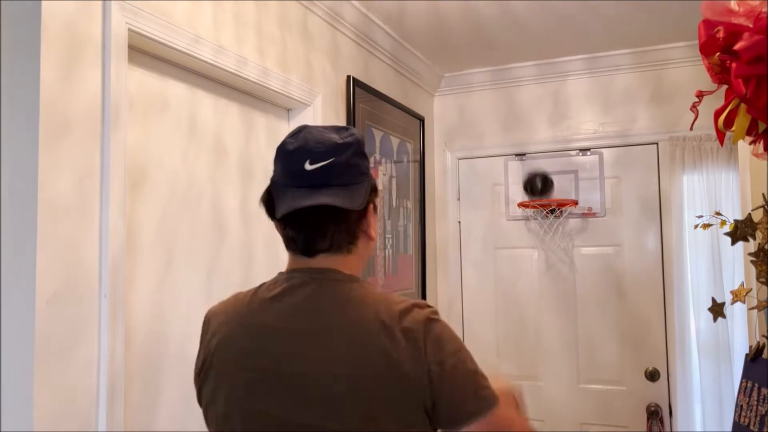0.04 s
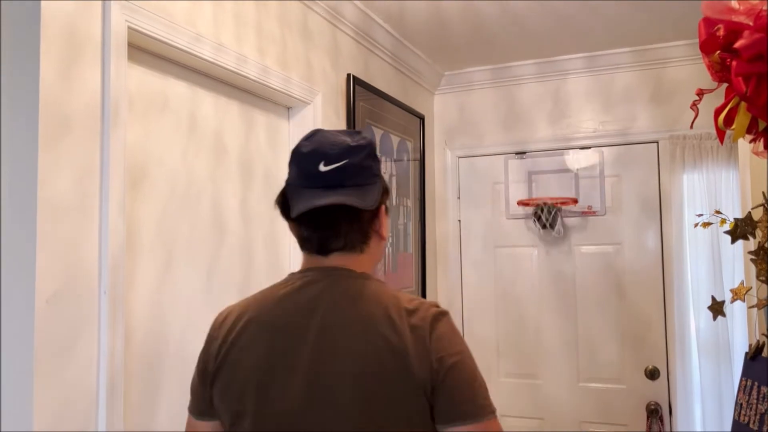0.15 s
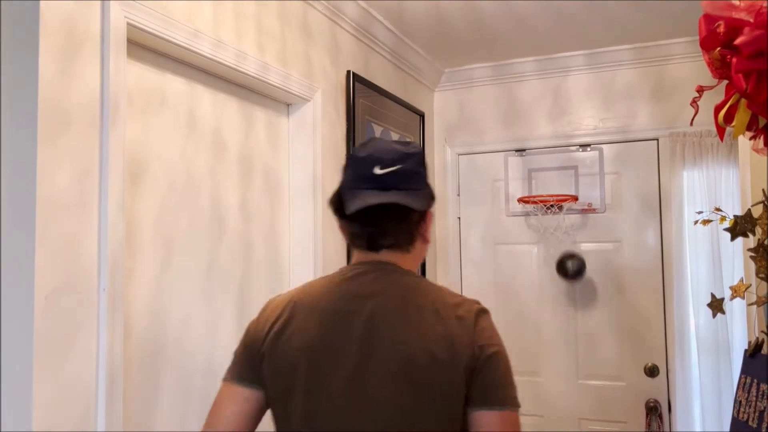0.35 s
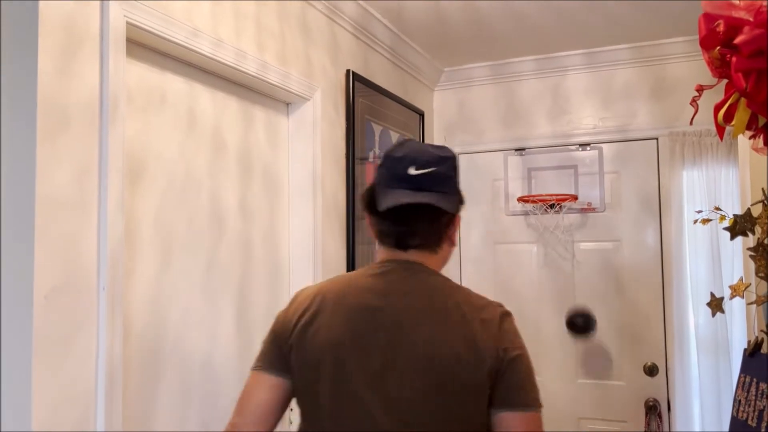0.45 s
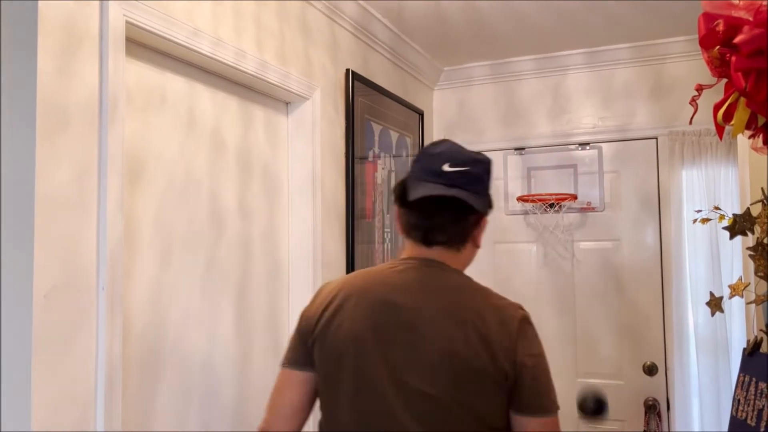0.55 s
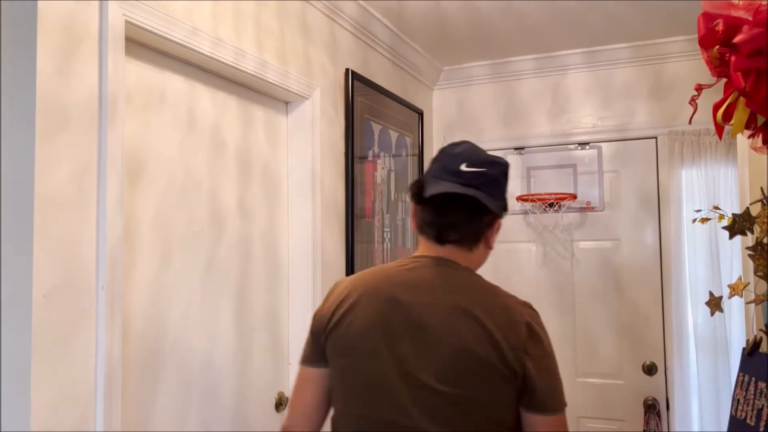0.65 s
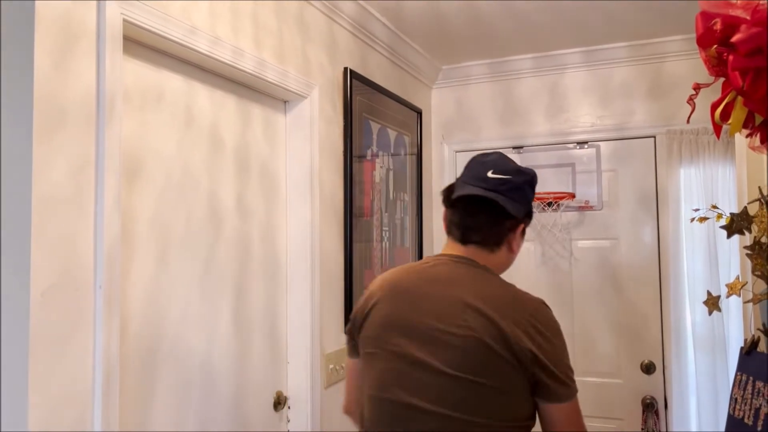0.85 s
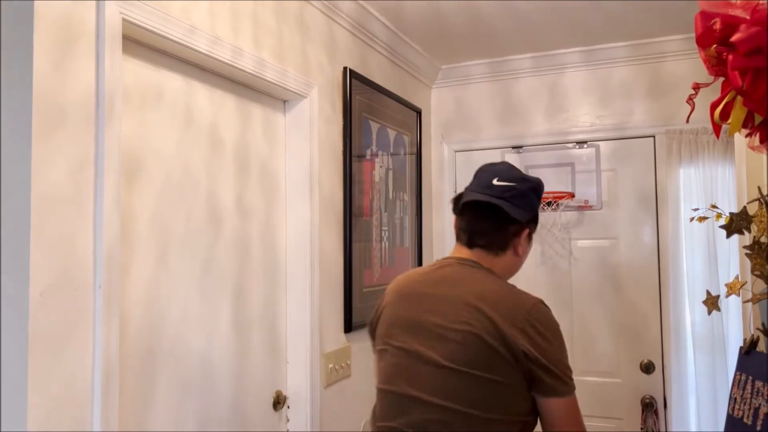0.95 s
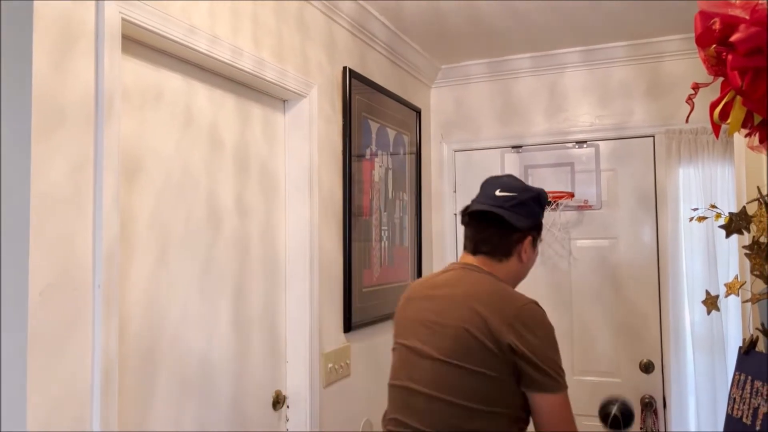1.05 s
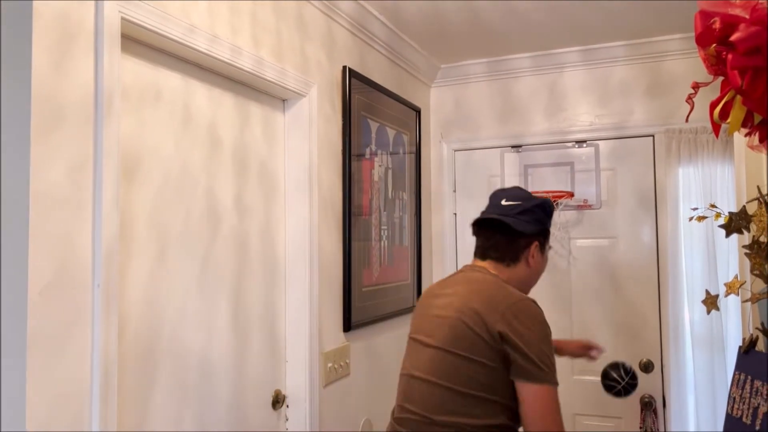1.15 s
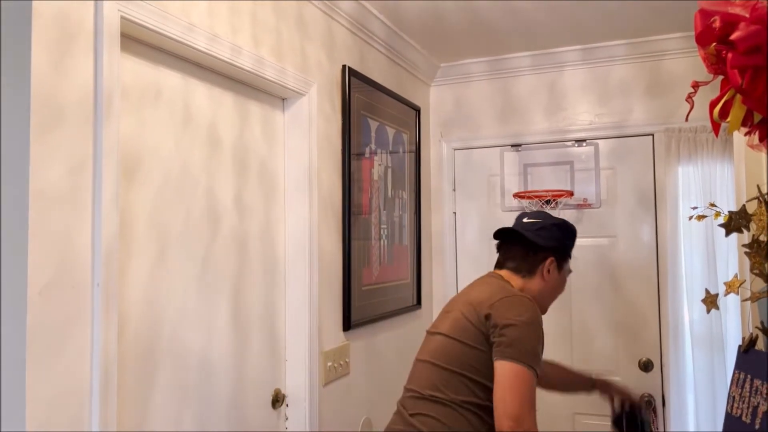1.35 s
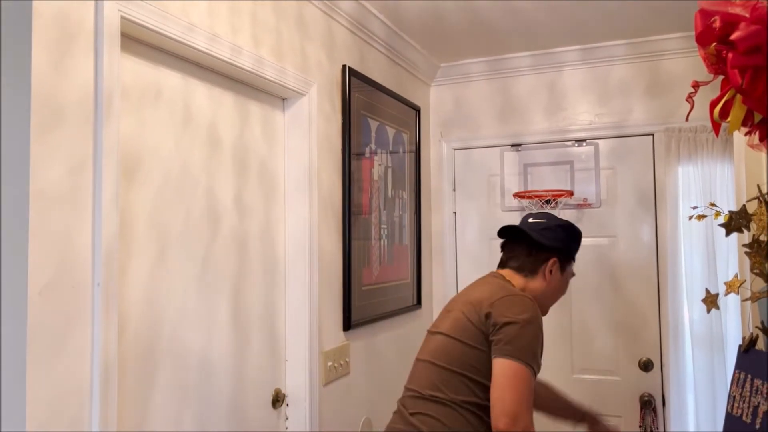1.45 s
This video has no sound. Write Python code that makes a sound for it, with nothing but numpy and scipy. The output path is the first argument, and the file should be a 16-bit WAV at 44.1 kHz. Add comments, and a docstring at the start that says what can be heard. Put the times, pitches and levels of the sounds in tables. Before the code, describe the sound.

Toy hoop rattle and dull door thumps come first, then faint rim ticks and one loud ball bounce on a hard floor, ending with a soft hand touch, in a small, lively indoor hallway, in stereo.

```python
"""In a hallway, a small ball grazes a toy hoop hung on a hollow door and strikes its rim.
The rim and board ring as decaying modes over bursts of clatter noise, and the board thumps the door.
The ball then slaps on the hard floor with a noise slap, a ringing body and a low thud, is touched by
a hand and starts a new bounce. The hallway answers with decaying noise over a rumble and a house hum."""
import sys
import numpy as np
from scipy import signal
from scipy.fft import rfft, irfft, next_fast_len
from scipy.io import wavfile

SR = 44100
rng = np.random.default_rng(int(sys.argv[2]) if len(sys.argv) > 2 else 0)


def transcribe(signal):
    """Save signal, clipped to [-1, 1], as a 16-bit WAV file at the path in sys.argv[1]."""
    frames = np.atleast_2d(signal).T
    limited = np.clip(frames, -1, 1)
    pcm = np.round(limited * 32767).astype(np.int16)
    wavfile.write(sys.argv[1], SR, pcm)


N = 66150
T = np.arange(N) / SR  # seconds


def amp(db):
    """Turn dB into gain."""
    return 10 ** (np.asarray(db) / 20)


def unit(x):
    """Scale a signal to rms 1."""
    return x / np.sqrt(np.mean(x ** 2) + 1e-20)


def along(points, hz):
    """Read a curve of (Hz, value) points on a log frequency axis."""
    f, v = np.transpose(points)
    return np.interp(np.log(hz + 1), np.log(f + 1), v)


def filtered(x, response):
    """Multiply the spectrum of x by a response given as a function of frequency."""
    size = next_fast_len(N + 8192)
    spectrum = rfft(x, size) * response(np.fft.rfftfreq(size, 1 / SR))
    return irfft(spectrum, size)[..., :N]


def shape(start, rise, t60):
    """Soft rise from the start, then exponential decay by 60 dB in t60 seconds."""
    t = np.maximum(T - start, 0)
    return (1 - np.exp(-t / rise)) * amp(-60 * t / t60)


def ring(modes, start, rise, scatter_db, rough_hz=0):
    """Modes set ringing at one moment, first swing inward; a random phase walk widens rough ones."""
    gains = amp(scatter_db * rng.standard_normal(len(modes)))
    first = min(int(start * SR), N - 1)
    steps = rng.standard_normal((len(modes), N - first))
    wander = np.cumsum(steps, axis=1) * np.sqrt(2 * np.pi * rough_hz / SR)
    out = np.zeros(N)
    for gain, phase, (hz, db, t60) in zip(gains, wander, modes):
        swing = np.sin(2 * np.pi * hz * (T[first:] - start) + phase)
        out[first:] -= gain * amp(db) * shape(start, rise, t60)[first:] * swing
    return out


def noise(spectrum):
    """Coloured noise of rms 1."""
    return unit(filtered(rng.standard_normal(N), lambda hz: amp(along(spectrum, hz))))


# Contacts with the hoop. Each row: start in seconds, ring level in dB, clatter level in dB,
# time for the clatter to fall by 20 dB in seconds.
HOOP_CONTACTS = [(0.195, -44, -36, 0.039), (0.246, -32.5, -14, 0.027), (.256, -24.5, -23, .015),
                 (0.292, -29.5, -25.5, .01), (0.319, -32, -25, 0.025), (0.333, -23, -21, 0.024),
                 (0.338, -26.5, -24, .01), (0.344, -39.5, -24, 0.018), (0.381, -50.5, -36, 0.014),
                 (0.407, -70, -52.5, 0.027), (0.424, -51.5, -57, 0.012), (0.618, -81, -43.5, 0.0057)]
# Modes of rim and board. Each row: frequency in Hz, level in dB, t60 in seconds.
HOOP_MODES = [(662.5, 1, .12), (705.9, 2.5, 0.13), (1079, -1, 0.1), (1177.5, 0.5, 0.051), (1853, -4, 0.037),
              (1845, -12, 0.0436), (1909, -9.5, 0.04), (4860, -15, .02), (5350, -8, 0.071),
              (6060, 4, 0.013), (10700, -44, 0.018)]
# Colour of the clatter. Each row: frequency in Hz, level in dB.
CLATTER_COLOUR = [(200, -29.5), (500, -18.5), (900, -26), (1400, -23.5), (2000, -19), (3000, -23.5),
                  (5300, -18), (7000, -28), (11000, -22.5), (14500, -41), (15600, -48)]
RING_RISE_S, CLATTER_RISE_S = 0.0014, 0.005
HOOP_ROUGH_HZ = 10  # line width from loose fittings


def hoop():
    """Each contact rings the modes of rim and board and releases a short noise clatter."""
    grit = noise(CLATTER_COLOUR)
    out = np.zeros(N)
    for start, ring_db, clatter_db, fall_20db_s in HOOP_CONTACTS:
        out += amp(ring_db) * ring(HOOP_MODES, start, RING_RISE_S, scatter_db=3.5, rough_hz=HOOP_ROUGH_HZ)
        out += amp(clatter_db) * grit * shape(start, CLATTER_RISE_S, 3 * fall_20db_s)
    return out


# Faint ticks as the rim settles. Each row: start in seconds, level in dB.
SETTLING_TICKS = [(.598, -55), (.725, -48), (.816, -48)]
# The mode that ticks. Each row: frequency in Hz, level in dB, t60 in seconds.
TICK_MODES = [(1085, 0, .055)]


def rim_ticks():
    """The settling rim rings one mode faintly, with a soft onset."""
    return sum(amp(db) * ring(TICK_MODES, start, .006, scatter_db=0) for start, db in SETTLING_TICKS)


# Thumps of the board on the door. Each row: start in seconds, level in dB.
DOOR_THUMPS = [(.212, -14.5), (0.233, -21.5), (.254, -20), (0.264, -19.5), (.289, -10), (.322, -0.5),
               (.353, -7), (.383, -11.5), (.405, -17), (.42, -18), (0.454, -23)]
# Modes of the hollow panel. Each row: frequency in Hz, level in dB, t60 in seconds.
DOOR_MODES = [(41.3, -12, .3), (74.2, -9.5, .3), (110, 3.5, 0.055), (148.1, -6, 0.095), (191.4, -2, 0.05),
              (264, -13.5, .05), (369, -29.5, 0.039)]
DOOR_RISE_S = .0035


def door():
    """The board thumps the hollow panel, which rings in short low modes."""
    return sum(amp(db) * ring(DOOR_MODES, start, DOOR_RISE_S, scatter_db=1) for start, db in DOOR_THUMPS)


# Ball on board, floor and hand. Each row: start in seconds, slap level in dB, body level in dB,
# thud level in dB.
BALL_CONTACTS = [(.197, -54.5, -33.5, -64), (0.9204, -16.5, -9, -8), (1.138, -50, -53, -44),
                 (1.4945, -51, -30.5, -60)]
# Colour of the slap. Each row: frequency in Hz, level in dB.
SLAP_COLOUR = [(150, -48), (400, -24.5), (1000, -9.5), (2070, -18.5), (3280, -22.5), (4960, -20),
               (7880, -18.5), (10000, -14.5), (14800, -20.5), (15900, -28)]
SECOND_SLAP_S, SECOND_SLAP_DB, SLAP_T60_S = 0.0018, 5.5, .015  # delay and gain over the first slap
SLAP_ENERGY_S = 0.0041  # the slap as the hallway hears it: a click with the energy of this much noise


def ball_slaps():
    """A double slap of skin in coloured noise, heard close."""
    skin = noise(SLAP_COLOUR)
    out = np.zeros(N)
    for start, slap_db, _, _ in BALL_CONTACTS:
        first = shape(start, 0.000067, SLAP_T60_S)
        second = amp(SECOND_SLAP_DB) * shape(start + SECOND_SLAP_S, 0.00023, SLAP_T60_S)
        out += amp(slap_db) * skin * (first + second)
    return out


def slap_clicks():
    """The slaps as coloured clicks, which set off the hallway."""
    clicks = np.zeros(N)
    for start, slap_db, _, _ in BALL_CONTACTS:
        clicks[int((start + SECOND_SLAP_S) * SR)] = amp(slap_db) * np.sqrt(SLAP_ENERGY_S * SR)

    def colour(hz):
        gain = amp(along(SLAP_COLOUR, hz))
        return gain / np.sqrt(np.mean(gain ** 2))
    return filtered(clicks, colour)


# Modes of the ball. Each row: frequency in Hz, level in dB, t60 in seconds.
BALL_MODES = [(554, -11, 0.081), (634, 1.5, 0.03), (780, -5.5, 0.017), (1380, -13, 0.017),
              (1960, -7.5, 0.014), (3040, -13.5, 0.021), (4960, -16.5, 0.03)]
# Modes of the floor. Each row: frequency in Hz, level in dB, t60 in seconds.
FLOOR_MODES = [(73.1, -11.5, 0.23), (111.7, 3, 0.088), (140, -11.5, 0.23), (299, -12, 0.095),
               (384, -7, 0.048)]
BALL_RISE_S, BALL_ROUGH_HZ = .0035, 12
THUD_LAG_S, THUD_RISE_S = 0.013, 0.0013


def ball_body():
    """The ball rings with the second slap, then the floor thuds a little later."""
    out = np.zeros(N)
    for start, _, body_db, thud_db in BALL_CONTACTS:
        out += amp(body_db) * ring(BALL_MODES, start + SECOND_SLAP_S, BALL_RISE_S,
                                   scatter_db=0.5, rough_hz=BALL_ROUGH_HZ)
        out += amp(thud_db) * ring(FLOOR_MODES, start + THUD_LAG_S, THUD_RISE_S, scatter_db=0.84)
    return out


# Stereo width. Each row: frequency in Hz, left-right spread in radians.
STEREO_WIDTH = [(60, 0.048), (250, 0.14), (700, 0.63), (2000, 0.69), (5000, 0.75), (8000, 0.12),
                (13000, 0.53)]


def spread(pair):
    """Left and right from two unrelated signals, mixed as mid and side, alike in the bass."""
    def balance(hz):
        angle = along(STEREO_WIDTH, hz)
        return np.array([np.cos(angle), np.sin(angle)])
    mid, side = filtered(pair, balance)
    return np.array([mid + side, mid - side])


# Decay of the hallway. Each row: frequency in Hz, t60 in seconds.
HALL_T60 = [(60, 0.84), (250, 0.35), (1000, 0.28), (4000, 0.41), (12000, 0.33)]
# Hallway level for hoop and door. Each row: frequency in Hz, level in dB against direct sound.
HIGH_HALL_LEVEL = [(60, -18.5), (250, 0.5), (1000, 3), (4000, -1.5), (12000, -12)]
# Hallway level for a source on the floor. Each row: frequency in Hz, level in dB against direct sound.
LOW_HALL_LEVEL = [(60, -19.5), (250, -6), (700, -3), (2000, 2), (5000, 3), (12000, -6.5)]
HALL_DELAY_S = .006


def hall(x, level):
    """The hallway answers with a noise tail whose frequencies each die at their own speed."""
    hz, t, grains = signal.stft(rng.standard_normal((2, SR)), SR, nperseg=256)
    fade = amp(-60 * t / along(HALL_T60, hz)[:, None])
    fade /= np.linalg.norm(fade, axis=1, keepdims=True)  # equal energy, so the level curve sets the balance
    fade *= amp(along(level, hz))[:, None]
    tail = signal.istft(grains * fade, SR, nperseg=256)[1] / np.sqrt(128)
    late = np.pad(x, (int(HALL_DELAY_S * SR), 0))[None]
    return spread(signal.fftconvolve(late, tail, axes=1)[:, :N])


# Course of the rumble after the blows. Each row: time in seconds, level in dB.
RUMBLE_COURSE = [(0.45, -30.5), (0.502, -35), (0.648, -41.5), (0.966, -42.5), (1.2, -50.5)]
# Colour of the rumble. Each row: frequency in Hz, level in dB.
RUMBLE_COLOUR = [(30, -33.5), (45, -15), (85, -0.5), (160, -8), (296, -17), (830, -33), (1600, -38),
                 (3000, -73.5)]
RUMBLE_FADE_S = .04


def rumble():
    """A low noise rumble lingers after the blows, faded in before its first point and out after its last."""
    s, db = np.transpose(RUMBLE_COURSE)
    fade = np.clip(np.minimum(T - s[0], s[-1] - T) / RUMBLE_FADE_S + 1, 0, 1)
    level = amp(np.interp(T, s, db))
    return fade * level * spread(np.array([noise(RUMBLE_COLOUR), noise(RUMBLE_COLOUR)]))


# Colour of the house hum. Each row: frequency in Hz, level in dB.
HUM_COLOUR = [(25, -26), (45, -8.5), (62, 0), (93, -10.5), (209, -17.5), (305, -23.5), (457, -25.5),
              (919, -36.5), (1200, -37), (3720, -46), (7910, -60), (12500, -51.5), (15500, -65)]
HUM_DB = -47


def hum():
    """The house hums as steady noise, strongest in the bass."""
    return amp(HUM_DB) * spread(np.array([noise(HUM_COLOUR), noise(HUM_COLOUR)]))


HOOP_PAN_DB, BALL_PAN_DB = 0.45, 0.35  # up on the left, down on the right


def panned(x, db):
    """Place a source slightly to the left by level."""
    return x * amp([[db], [-db]])


def scene():
    """Hoop, door and ball, each with the hallway, over the rumble and the hum of the house."""
    above = hoop() + rim_ticks() + door()
    body = ball_body()
    direct = panned(above, HOOP_PAN_DB) + panned(ball_slaps() + body, BALL_PAN_DB)
    answer = hall(above, HIGH_HALL_LEVEL) + hall(slap_clicks() + body, LOW_HALL_LEVEL)
    return direct + answer + rumble() + hum()


# Phase between the spaced microphones. Each row: frequency in Hz, lead of the left in radians.
LEFT_LEAD_PHASE = [(900, 0), (1460, -.7), (2500, .8), (4200, 0), (6500, -1.5), (8300, -3.14), (9300, -3.8),
                   (10800, -5.2), (12300, -6.28), (15000, -9.2)]
LOW_CUT_HZ, LOW_CUT_Q, TOP_HZ = 62.3, 1, 16000


def record(dry):
    """Spaced microphones shift left against right in phase, with a low cut and a sharp top limit."""
    def response(hz):
        low_cut = -hz ** 2 / (LOW_CUT_HZ ** 2 - hz ** 2 + 1j * hz * LOW_CUT_HZ / LOW_CUT_Q)
        pair = np.exp(np.outer([.5j, -.5j], along(LEFT_LEAD_PHASE, hz)))
        return low_cut * pair * (hz < TOP_HZ)
    return filtered(dry, response)


dry = scene()
out = record(dry)
transcribe(out)
```